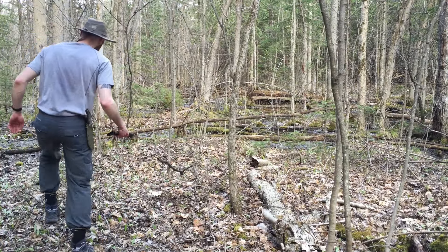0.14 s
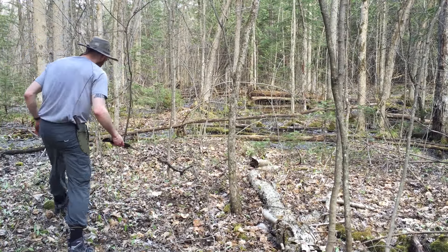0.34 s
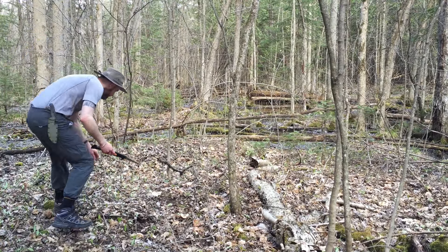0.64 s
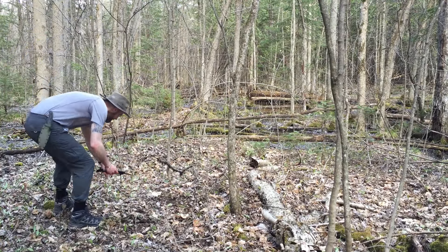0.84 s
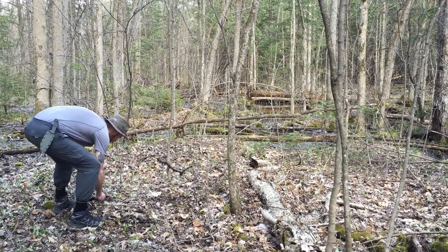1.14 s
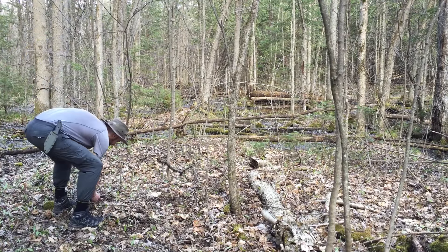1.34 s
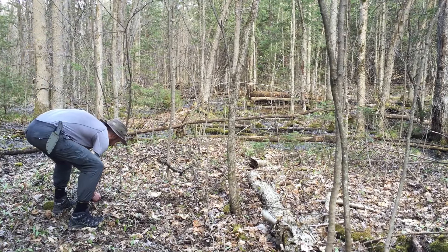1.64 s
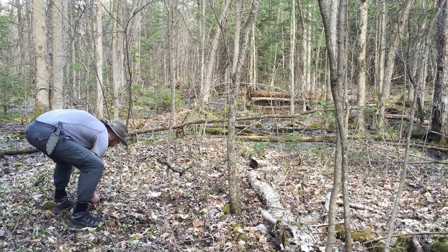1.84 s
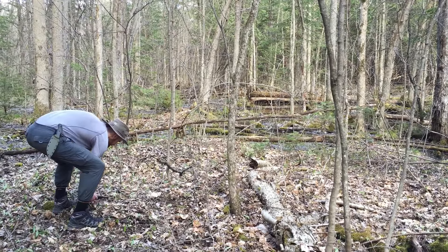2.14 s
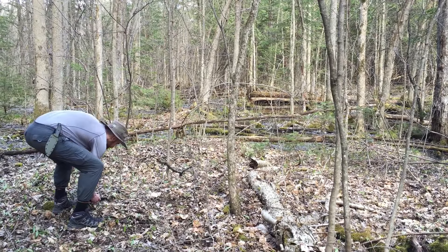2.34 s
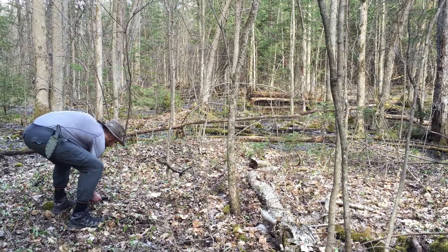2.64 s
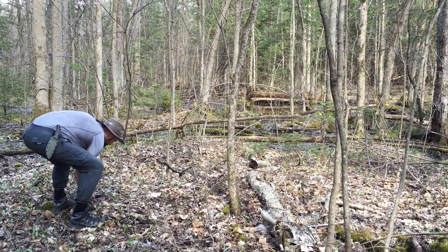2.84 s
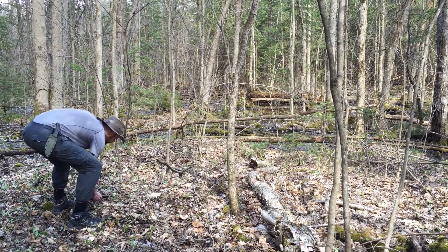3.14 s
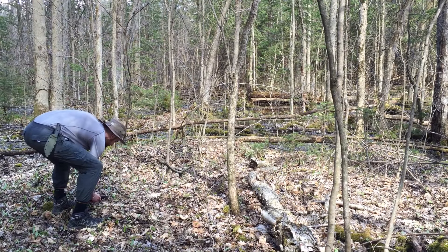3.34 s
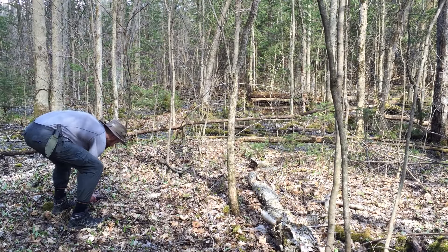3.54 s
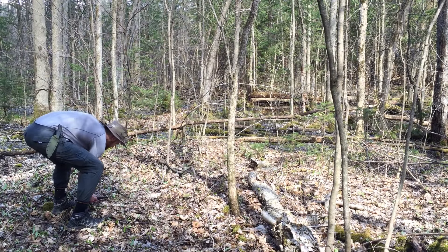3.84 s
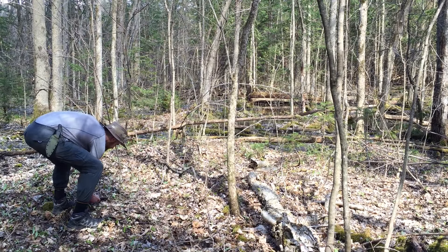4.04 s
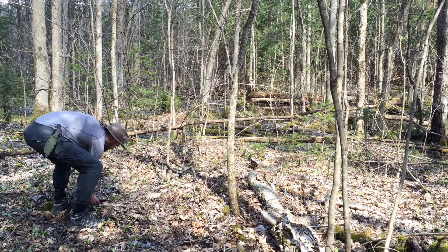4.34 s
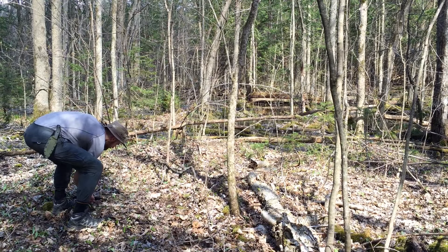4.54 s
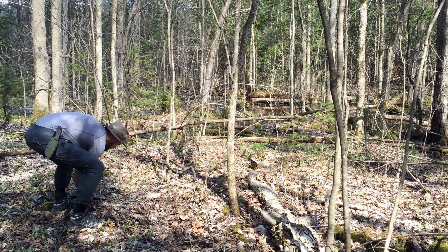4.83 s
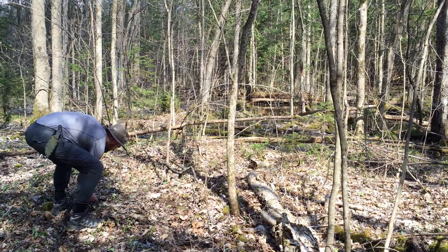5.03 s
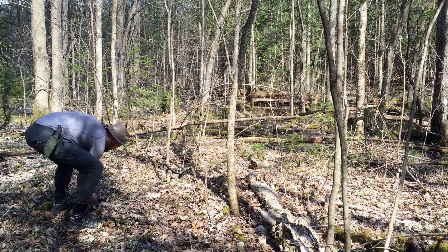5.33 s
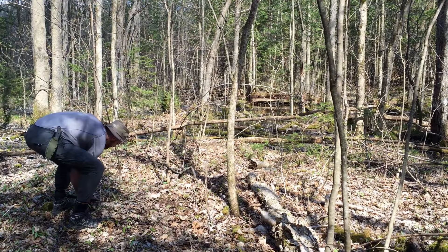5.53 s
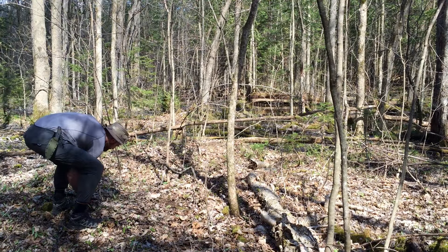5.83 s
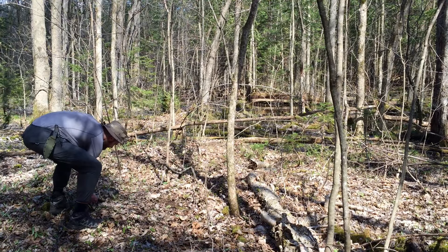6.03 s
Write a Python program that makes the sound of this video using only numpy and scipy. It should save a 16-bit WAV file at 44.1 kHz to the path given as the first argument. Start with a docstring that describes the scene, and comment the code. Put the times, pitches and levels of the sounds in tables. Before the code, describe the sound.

Boots crunch on dry leaves and twigs tick, then short gritty scrapes with clicking, faintly ringing catches clear the forest floor, growing louder.

```python
"""Clearing leaf litter with a hand tool

Two steps crunch through dry leaves in a quiet forest, then a small hand tool clears the ground.
Each stroke is dense crackle shaped by one push: grit drives the tool's modes while leaves crush.
Catches are a noise crack plus a short modal ring; twigs are noise bursts filtered to a hollow tick.
Behind lie faint hiss, far rumble, a wavering low drone and an early hum, all from filtered noise."""
import sys
import numpy as np
from scipy import signal
from scipy.io import wavfile
from scipy.ndimage import uniform_filter1d

SR = 44100
rng = np.random.default_rng(int(sys.argv[2]) if len(sys.argv) > 2 else 0)


def generate_wav(sig):
    """Save sig (samples, or channels by samples) to the path in sys.argv[1] as 16-bit PCM at SR."""
    pcm = np.round(np.clip(np.atleast_2d(sig).T, -1, 1) * 32767).astype(np.int16)
    wavfile.write(sys.argv[1], SR, pcm)


N = 272538
TIME_S = np.arange(N) / SR

# Tool strokes. Each row: start in seconds, length in seconds, force in dB, leaf crispness in dB.
STROKE_ROWS = [(1.595, 0.15, -56, 2.5), (1.803, 0.056, -63, -11), (1.998, 0.17, -62, 7),
               (2.178, 0.13, -60.5, 8), (2.36, 0.12, -60.5, 4), (2.499, 0.093, -56.5, 10),
               (2.677, 0.15, -60.5, 6.5), (2.822, .17, -51, 3), (3.022, 0.11, -58, -15),
               (3.571, 0.15, -53.5, -2), (3.736, .15, -52, -4.5), (3.884, 0.18, -59, -4),
               (4.089, 0.089, -50.5, -1), (4.232, .13, -51, 3.5), (4.369, 0.13, -49.5, 3),
               (4.52, 0.16, -50.5, 8), (4.681, .16, -53, -8), (4.865, 0.16, -47.5, 6.5),
               (5.029, 0.15, -49.5, -2.5), (5.197, 0.14, -45.5, 5.5), (5.359, .13, -40, -3.5),
               (5.496, .17, -48.5, 4), (5.664, 0.15, -49.5, 0), (5.849, 0.16, -46.5, 4.5),
               (5.985, 0.18, -49, -8)]
# Nominal tool modes. Each row: frequency in Hz, level in dB, T60 in seconds.
TOOL_MODES = [(674, -16.5, 0.069), (1013, -6, 0.043), (1199, -4.5, 0.061), (1426, -8.5, 0.022),
              (1662, -6, 0.032), (2000, -5, 0.038), (2157, -1, 0.044), (2520, -12.5, 0.08),
              (4370, -11, 0.042), (4960, -6.5, 0.017)]
# Spectrum of grit and soil. Each row: frequency in Hz, relative density in dB per Hz.
SOIL_SPECTRUM = [(120, -20), (220, -4), (300, -10), (430, -4), (600, 0), (800, -1), (1100, 3.5), (1500, 0),
                 (1850, -7.5), (2150, -2), (2700, 0.5), (3100, -14), (3800, -13.5), (6000, -25.5)]
# Spectrum of crushed leaves. Each row: frequency in Hz, relative density in dB per Hz.
LEAF_SPECTRUM = [(1500, -42.5), (3200, -11), (3900, -4.5), (4550, 2), (5100, -5), (5800, -7), (6500, -15.5),
                 (7400, -23.5), (8700, -20), (11000, -32), (16000, -56.5)]
# Spectrum of crisp leaf edges. Each row: frequency in Hz, relative density in dB per Hz.
CRISP_SPECTRUM = [(2000, -16), (4000, 4), (6300, 5), (7400, -3.5), (8700, 1.5), (9900, -13), (11500, -7),
                  (16000, -20.5)]


def strokes(size=12288):
    """Each push drags grit along the tool, which rings with the force while leaves crackle."""
    usual_force_db = -50
    # Each law: dB at usual force and zero crispness, dB per dB of force, dB per dB of crispness.
    soil_law, leaf_law, crisp_law = (-55, 0.87, 0.32), (-53.5, 0.44, 0.25), (-64.5, 0.68, 1.04)
    laws = np.array([soil_law, leaf_law, crisp_law])
    out = np.zeros(N)
    for start_s, length_s, force_db, crispness_db in STROKE_ROWS:
        soil_db, leaf_db, crisp_db = laws @ [1, force_db - usual_force_db, crispness_db]
        grit = crackle(size, count=10, low_hz=400, high_hz=2800, per_s=330,
                       spread_db=4.5, t60_s=0.016, tone=0.5)
        leaves = crackle(size, count=6, low_hz=4100, high_hz=6000, per_s=260,
                         spread_db=5, t60_s=0.016, tone=0.9)
        edges = crackle(size, count=6, low_hz=5340, high_hz=12000, per_s=780,
                        spread_db=2.5, t60_s=0.003, tone=0.5)
        # the point of contact wanders, so that now one mode sings and now another
        contact = signal.resample(rng.standard_normal((len(TOOL_MODES), 20)), size, axis=1)
        drive = grit * amp(5.5 * contact)
        ring = signal.fftconvolve(drive, tool_modes(), axes=1).sum(0)[:size]
        sound = amp(soil_db) * colour(grit, SOIL_SPECTRUM)
        sound += amp(force_db) * steadied(ring, size=2600)
        sound += amp(leaf_db) * colour(leaves + grit, LEAF_SPECTRUM)
        sound += amp(crisp_db) * colour(edges, CRISP_SPECTRUM)
        add(out, start_s, push(TIME_S[:size] / length_s) * sound)
    return out * waver(depth_db=1.7, top_hz=60)  # the tool judders as it drags


def push(share):
    """The hand's force over one stroke, from 0 to 1 and back; a larger power is more pointed."""
    peak_share, power = 0.53, 1.52
    return np.sin(np.pi / 2 * np.interp(share, [0, peak_share, 1], [0, 1, 0])) ** power


def tool_modes(detune=0.019, rise_s=0.00033, size=4096):
    """Decaying tool modes, one a row; grip and soil shift their pitches a little each time."""
    hz, db, t60_s = np.transpose(TOOL_MODES)[:, :, None]
    t = np.arange(size) / SR
    shifted_hz = hz * (1 + detune * rng.uniform(-0.87, 1, hz.shape))
    turns = shifted_hz * t + rng.random(hz.shape)
    return amp(db - 60 * t / t60_s) * np.sin(2 * np.pi * turns) * (1 - np.exp(-t / rise_s))


def catches(reach_octaves=0.58):
    """The tool breaks free of a twig or stone: a dry crack and a ring of the modes near one pitch."""
    # Each row: time in seconds, strength in dB (ring peaks 8.5 dB lower), centre of the ring in Hz,
    # crack treble in dB relative to the strength (before a fixed 16.5 dB cut).
    hard_catches = [(1.692, -32.5, 2160, -34), (1.713, -36, 2150, -20), (2.355, -40, 1200, -23),
                    (2.707, -31.5, 1420, -26), (2.839, -35, 1190, -9.5), (2.869, -30, 1000, -2),
                    (2.907, -31, 2270, -7), (2.932, -32, 1200, -8), (2.959, -24.5, 1210, -19.5),
                    (3.052, -37.5, 2210, -10), (3.216, -42.5, 1210, -3), (3.321, -54, 1190, -6.5),
                    (3.594, -32, 2230, -13.5), (3.618, -37.5, 993, 1.5), (3.652, -23.5, 1210, -12.5),
                    (3.678, -30, 1300, -13), (3.963, -37, 2240, 2.5), (3.971, -27.5, 2630, -2.5),
                    (4.004, -33, 2190, -8), (4.115, -36, 2000, -5.5), (4.235, -45.5, 1190, -3),
                    (4.298, -27.5, 2000, -13), (4.321, -24.5, 1360, -13.5), (4.631, -25, 1340, -11.5),
                    (4.92, -40, 1270, -8), (4.975, -29.5, 1640, -10), (5.117, -27, 2180, -14),
                    (5.209, -27, 1260, -11.5), (5.279, -30.5, 1720, -3.5), (5.303, -24, 1230, -13),
                    (5.417, -18.5, 2120, -21), (5.547, -29, 1170, -10), (5.566, -28.5, 1020, -12.5),
                    (5.581, -22.5, 2020, -13.5), (5.608, -29, 2000, -18), (5.627, -24, 1190, -21),
                    (5.863, -39.5, 1140, -10), (5.886, -37.5, 2170, -7.5), (5.912, -28, 1900, -6),
                    (5.936, -29, 1190, -9.5), (5.956, -28, 1170, -11.5)]
    out = np.zeros(N)
    mode_hz = np.transpose(TOOL_MODES)[0]
    for at_s, db, hz, treble_db in [*hard_catches, *snags()]:
        crack = burst(t60_s=0.05, rise_s=0.0003)
        nearness = np.exp(-abs(np.log2(mode_hz / hz)) / reach_octaves)
        ring = nearness @ tool_modes(rise_s=0.00076)
        add(out, at_s, amp(db - 8.5) * ring / abs(ring).max())
        snap = colour(crack, LEAF_SPECTRUM) + amp(-0.5) * colour(crack, SOIL_SPECTRUM)
        snap += amp(-18) * colour(crack, CRISP_SPECTRUM)
        add(out, at_s, amp(db + treble_db - 16.5) * snap)
    return out


def snags(low_hz=1000, high_hz=2300, treble_db=-9):
    """Lesser catches at random in the body of each stroke, stronger where the push is stronger."""
    per_stroke, over_force_db, spread_db = 2, 10, 1.5
    rows = []
    for start_s, length_s, force_db, crispness_db in STROKE_ROWS:
        for when, pitch, strength in rng.random((per_stroke, 3)):
            share = 0.15 + 0.7 * when
            db = force_db + over_force_db + 10 * np.log10(push(share))
            db += spread_db * (2 * strength - 1)
            hz = low_hz * (high_hz / low_hz) ** pitch
            rows.append((start_s + share * length_s, db, hz, treble_db + 0.5 * crispness_db))
    return rows


def twigs(rise_s=0.00012):
    """Thin wood snaps with a hollow tick, an octave or so wide, and a bright edge."""
    # Each row: time in seconds, peak of the wood tick in dB, pitch in Hz,
    # treble of the edge in dB relative to that peak (before a fixed 17 dB cut).
    twig_snaps = [(.025, -45, 950, 2.5), (.175, -42, 1780, -16), (.339, -37.5, 1170, -36),
                  (.361, -44.5, 1570, -12), (.377, -42, 1100, -12), (.544, -36.5, 1010, -13),
                  (.851, -48.5, 694, -16), (1.012, -34, 1420, -7), (1.027, -42, 1540, -8),
                  (1.193, -54, 1010, -6), (1.365, -55, 2180, -3), (1.393, -45.5, 1040, -24),
                  (1.5, -55, 1320, -1)]
    out = np.zeros(N)
    for at_s, db, hz, treble_db in twig_snaps:
        crack = burst(t60_s=0.041, rise_s=rise_s)
        hollow = [(hz / 4, -24), (hz / 1.55, -2), (hz * 1.4, 0), (hz * 2, -28), (hz * 5, -52)]
        wood = colour(crack, hollow)
        edge = amp(db + treble_db - 17.0) * colour(crack, LEAF_SPECTRUM)
        add(out, at_s, amp(db) * wood / abs(wood).max() + edge)
    return out


def footsteps():
    """Boots sink into leaves, bear weight and come to rest: fine crunching, the deep part dying first."""
    # Each row: landing in seconds, length in seconds, crunch in dB, leaf rustle in dB,
    # rustle's fade over the step in dB.
    steps = [(0.384, 0.34, -50, -48.5, -11.5), (0.846, 0.25, -45, -45.5, -30)]
    # Each row: frequency in Hz, relative density in dB per Hz.
    crunch_spectrum = [(150, -10.5), (350, -8), (700, -1.5), (1050, 1.5), (1700, -1), (1900, -10),
                       (2200, -4.5), (3200, -16), (6000, -23)]
    sink_s, rest_s, crunch_fade_ratio = 0.061, 0.023, 1.28
    deep = crackle(2 * SR, count=16, low_hz=600, high_hz=1900, per_s=540,
                   spread_db=2.0, t60_s=0.012, tone=0.34)
    top = crackle(2 * SR, count=16, low_hz=3766, high_hz=8810, per_s=890,
                  spread_db=0, t60_s=0.016, tone=0.92)
    t = TIME_S[:len(deep)]
    weight, rustle = np.zeros(len(t)), np.zeros(len(t))
    for landing_s, length_s, crunch_db, leaf_db, fade_db in steps:
        sink = np.clip((t - landing_s) / sink_s, 0, 1) ** 1.45
        press = sink * np.clip((landing_s + length_s - t) / rest_s, 0, 1)
        settled_db = fade_db * np.clip((t - landing_s - sink_s) / (length_s - sink_s), 0, 1)
        weight += press * amp(crunch_db + crunch_fade_ratio * settled_db)
        rustle += press * amp(leaf_db + settled_db)
    crunch = weight * colour(deep, crunch_spectrum)
    # time-reversed crackle keeps the crisp part apart from the leaf part
    crisp = amp(-5.0) * colour(top[::-1], CRISP_SPECTRUM)
    leaves = rustle * (colour(top, LEAF_SPECTRUM) + crisp)
    return np.pad(crunch + leaves, (0, N - len(t)))


def trunks(x, t60_s=0.73, wet_db=-29, per_s=1500):
    """Tree trunks scatter a thin, dull echo: sparse random taps that decay."""
    t = np.arange(SR // 2) / SR
    taps = rng.standard_normal(len(t)) * (rng.random(len(t)) < per_s / SR) * amp(-60 * t / t60_s)
    taps = colour(taps, [(2000, 7.5), (12000, -15)])
    return x + amp(wet_db) * signal.oaconvolve(x, taps / np.linalg.norm(taps))[:N]


def forest(hum_hz=75, hum_db=-68, hum_end_s=2.2, hiss_db=-68.5):
    """Filtered noise: still air, a far rumble, a wavering drone and a deep hum that soon dies away."""
    # Each row of the two spectra: frequency in Hz, relative density in dB per Hz.
    hiss_spectrum = [(120, -32.5), (240, -6.5), (380, -10.5), (700, -12), (1200, -14), (1850, -17),
                     (2150, -14), (3200, -20.5), (4600, -15.5), (7000, -23), (16000, -31.5)]
    rumble_spectrum = [(20, -39), (32, -16), (42, -11), (60, 2.5), (90, -4), (120, 1.5), (150, -6),
                       (195, -4.5), (240, -21), (400, -22), (800, -56), (4000, -73)]
    # Each row of the two level curves: time in seconds, level before the waver in dB.
    rumble_curve = [(0, -60), (.32, -57.5), (.7, -64.5), (1.95, -70.5), (2.3, -57), (2.5, -66),
                    (3.2, -63.5), (4.1, -63.5), (4.75, -62.5), (4.92, -56), (5.4, -55), (6.17, -61)]
    drone_curve = [(0, -49), (.08, -47), (.16, -59), (.4, -58.5), (.72, -65.5), (1.8, -64.5), (3.22, -64),
                   (3.32, -54), (3.58, -53), (3.84, -67), (4.16, -52), (4.32, -61.5), (5.36, -49),
                   (5.9, -52.5), (6.17, -64)]
    air, low, wide, narrow, deep = rng.standard_normal((5, N))
    hiss = amp(hiss_db) * colour(air, hiss_spectrum)
    hum = steadied(resonate(deep, hum_hz, width_hz=6.4), size=9000)
    hum *= amp(hum_db) * np.clip((hum_end_s - TIME_S) / 0.38, 0, 1)
    rumble = steadied(colour(low, rumble_spectrum), size=7000)
    rumble *= amp(np.interp(TIME_S, *np.transpose(rumble_curve))) * waver(depth_db=2.2, top_hz=4)
    drone = colour(wide, [(100, -28.5), (140, -3.0), (180, -2.0), (205, -14.5),
                          (240, -32), (600, -52.5), (4000, -92)])
    drone = steadied(drone + 0.84 * resonate(narrow, hz=166.27, width_hz=12.9), size=4500)
    drone *= amp(np.interp(TIME_S, *np.transpose(drone_curve))) * waver(depth_db=1.13, top_hz=7)
    return hiss + hum + rumble + drone


def crackle(size, count, low_hz, high_hz, per_s, spread_db, t60_s, tone):
    """Many tiny fractures of uneven size from a few sources, each ticking at its own pitch."""
    sizes = amp(spread_db * np.minimum(rng.exponential(1, size), 3))
    clicks = (rng.random(size) < per_s / SR) * sizes
    owner = rng.integers(0, count, size)
    t = np.arange(2048) / SR
    grains = np.zeros(size)
    for k, hz in enumerate(low_hz * (high_hz / low_hz) ** rng.random(count)):
        tick = tone * np.sin(2 * np.pi * hz * t) * amp(-60 * t / t60_s) * (1 - np.exp(-hz * t / 2))
        grain = burst(t60_s, rise_s=0.0002) + tick
        grains += signal.fftconvolve(clicks * (owner == k), grain)[:size]
    return steadied(evened(grains) + 0.48 * rng.standard_normal(size), size=1400)


def burst(t60_s, rise_s, size=2048):
    """A fracture: a spurt of noise that dies at once."""
    t = np.arange(size) / SR
    return rng.standard_normal(size) * amp(-60 * t / t60_s) * (1 - np.exp(-t / rise_s))


def waver(depth_db, top_hz):
    """A gain that wanders at random: twelve slow sines, RMS depth in dB."""
    hz = top_hz * np.geomspace(0.3, 1, 12)[:, None]
    t = TIME_S[::64]
    drift = evened(np.sin(2 * np.pi * (hz * t + rng.random(hz.shape))).sum(0))
    return amp(depth_db * np.interp(TIME_S, t, drift))


def colour(x, points, size=4096):
    """Causal minimum-phase filter through (Hz, dB) points, output RMS 1; clicks keep a sharp front."""
    hz, db = np.transpose(points)
    bin_hz = abs(np.fft.fftfreq(size, 1 / SR))
    curve_db = np.interp(np.log(bin_hz + 1), np.log(hz), db)
    response = np.exp(np.conj(signal.hilbert(np.log(amp(curve_db)))))
    taps = np.fft.ifft(response).real
    return evened(signal.fftconvolve(x, taps[:size // 2])[:len(x)])


def resonate(x, hz, width_hz):
    """A steep resonance: the same band-pass twice, output RMS 1."""
    b, a = signal.iirpeak(hz, hz / width_hz, SR)
    return evened(signal.lfilter(b, a, signal.lfilter(b, a, x)))


def steadied(x, size):
    """Holds the running power at 1 and keeps the faster detail; size in samples."""
    return x / np.sqrt(uniform_filter1d(x ** 2, size) + 1e-9)


def evened(x):
    """Scales to RMS 1."""
    return x / np.sqrt(np.mean(x ** 2) + 1e-20)


def amp(db):
    """Amplitude ratio from dB."""
    return 10 ** (np.asarray(db) / 20)


def add(mix, start_s, sound):
    """Mixes a sound in place, cut at the end of the mix."""
    part = mix[max(round(start_s * SR), 0):][:len(sound)]
    part += sound[:len(part)]


def scene():
    """The work on the ground with its echo off the trees, over the forest background."""
    work = strokes() + catches() + twigs() + footsteps()
    return (trunks(work) + forest())[None]


def record(dry, edge_hz=15900):
    """The recorder's band limit: a linear-phase low-pass."""
    taps = signal.firwin(511, edge_hz, window=("kaiser", 9), fs=SR)
    return signal.oaconvolve(dry, taps[None], "same")


dry = scene()
out = record(dry)
generate_wav(out)
```